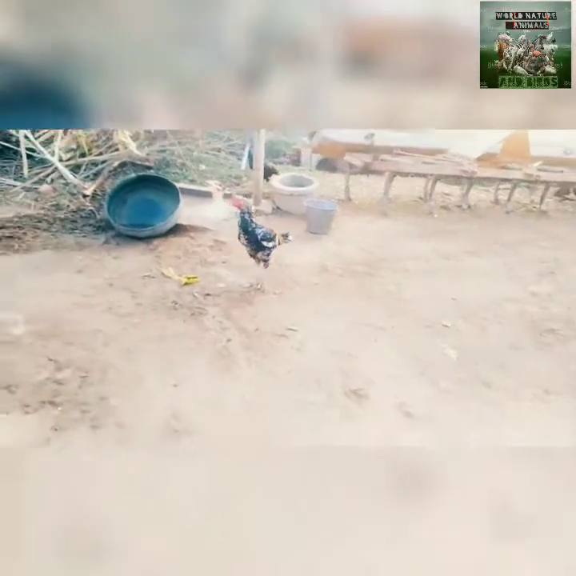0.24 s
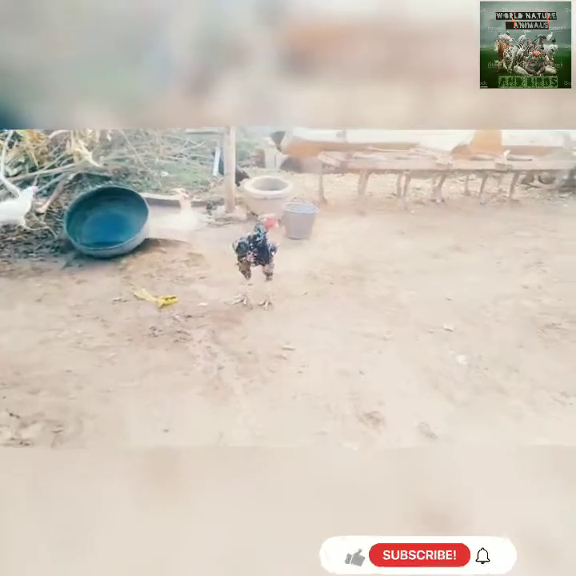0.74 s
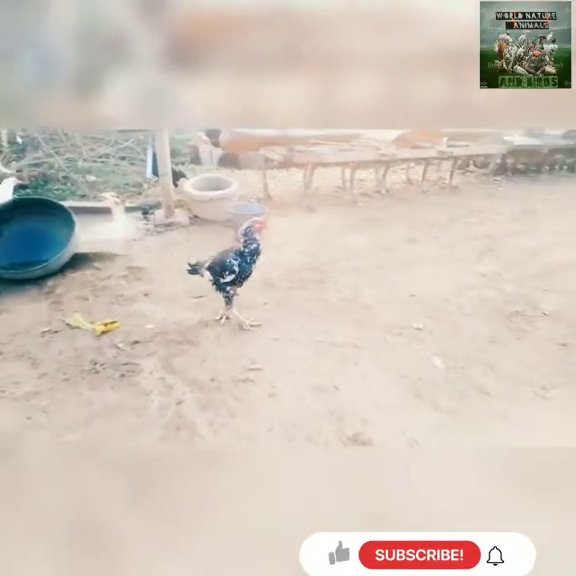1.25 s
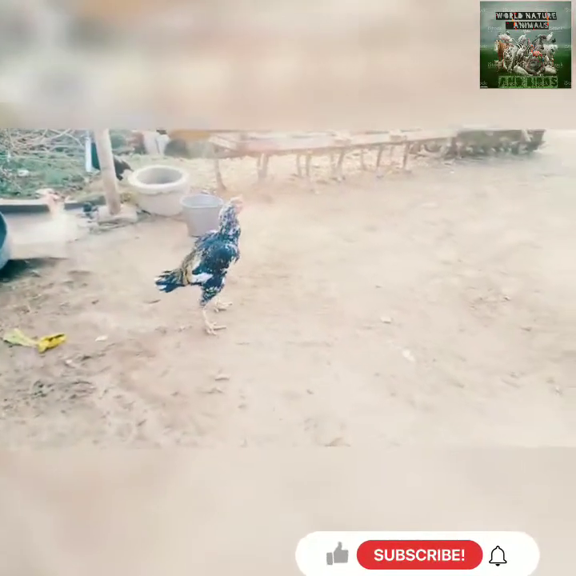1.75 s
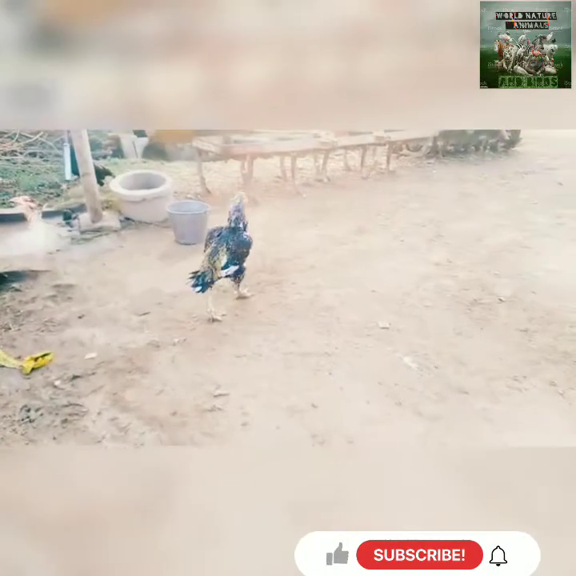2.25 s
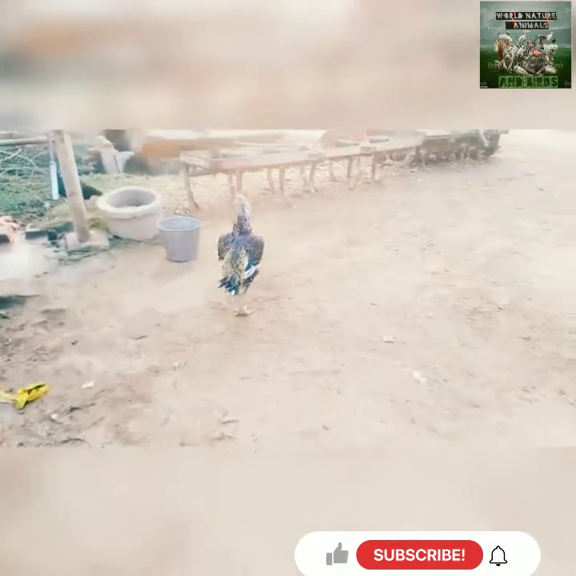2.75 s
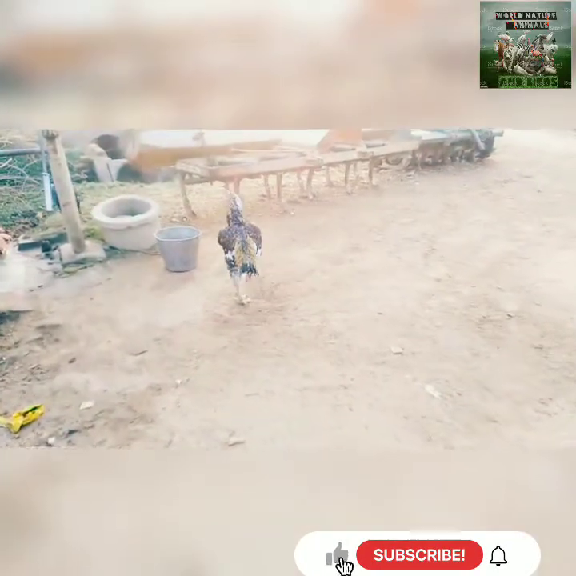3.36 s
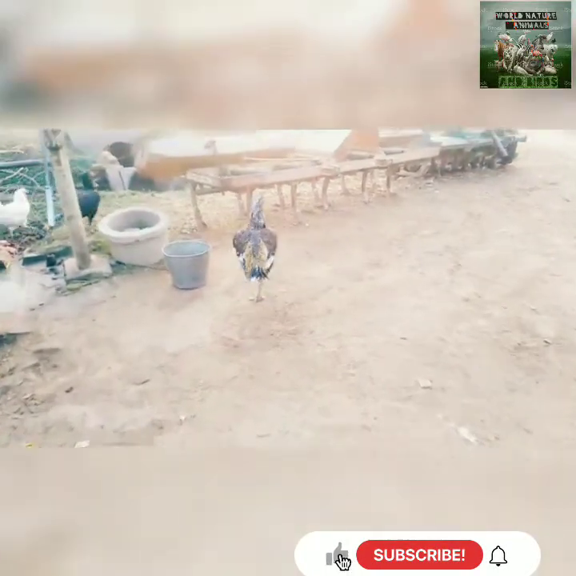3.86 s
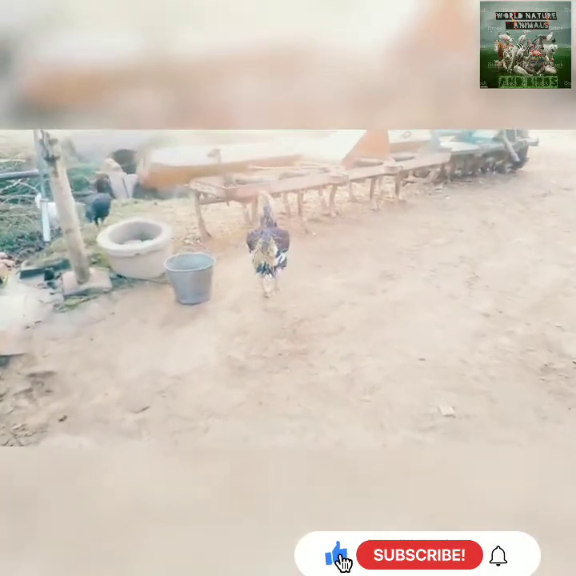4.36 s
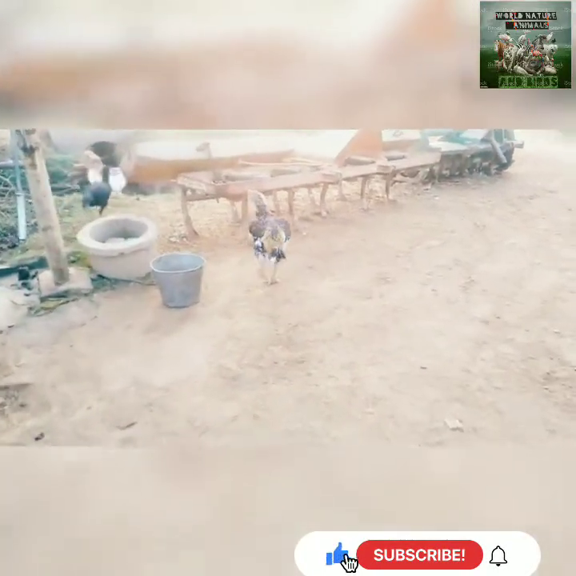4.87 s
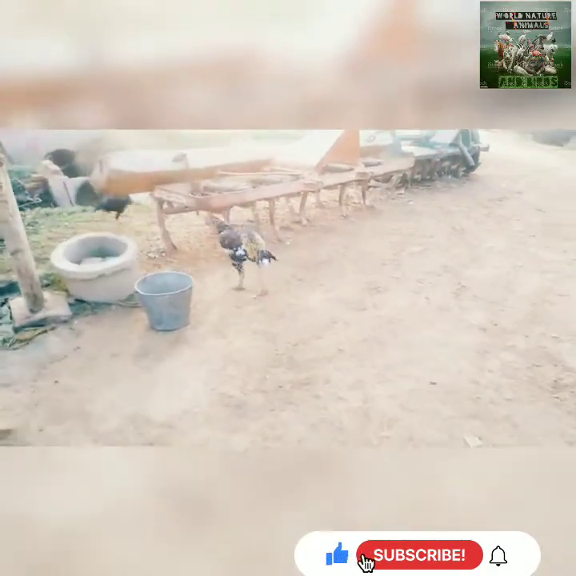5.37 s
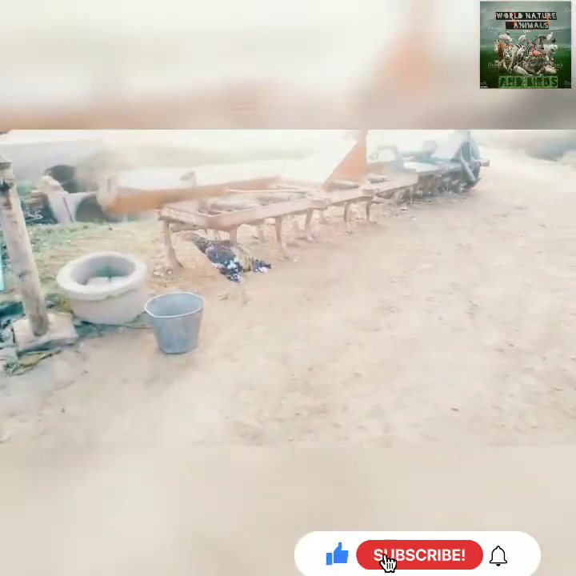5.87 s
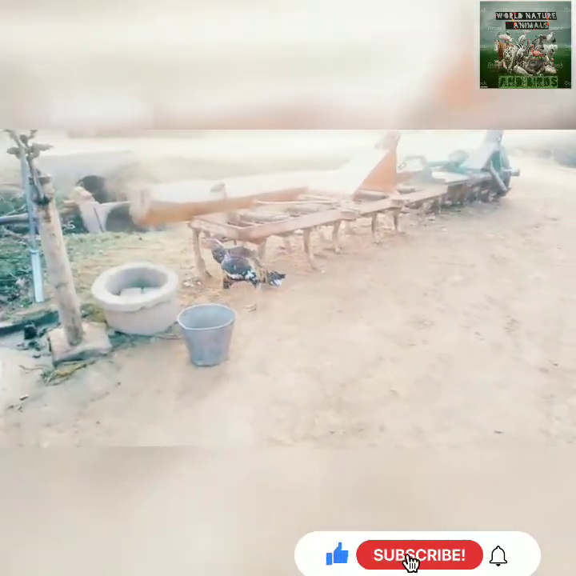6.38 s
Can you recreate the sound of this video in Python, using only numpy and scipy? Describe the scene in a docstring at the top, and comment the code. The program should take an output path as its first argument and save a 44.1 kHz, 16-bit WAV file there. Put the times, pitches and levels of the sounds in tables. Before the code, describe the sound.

A hen outdoors calls once, long and steady at a middle pitch, with small catches and a rough break, after a dull knock. Two strong clucks come right after. Muffled rising notes from a distant hen fill the middle, then scattered throaty clucks and wooden-sounding knocks get busier towards the end. Light scattered yard echo, soft scuffs, low rumble and faint hiss; quiet gaps are thinned by noise suppression on a simple microphone.

```python
"""Hen calling in an open yard

A hen gives one long, almost pure call from a swinging membrane, then scattered short clucks: pulse trains
coloured by throat and beak. Another hen answers from farther off. Bands of grainy noise give scuffs, low thumps
and the bright edges of clucks and knocks; knocks ring briefly under a crack. Faint wavering sines, most left by
noise suppression, flicker about, and low noise rumbles under it all. The yard adds a scattered echo, thin in
bass and brighter up to a treble cut."""
import sys
import numpy as np
from scipy import signal
from scipy.fft import rfft, irfft
from scipy.io import wavfile

SR = 44100
rng = np.random.default_rng(int(sys.argv[2]) if len(sys.argv) > 2 else 0)


def undo_db(level):
    """Turn decibels back into plain size, where 20 dB means ten times bigger."""
    steps = np.asarray(level, float) / 20
    return 10 ** steps


def unload_wav(signal):
    """Save mono or channel-first audio to the path in sys.argv[1] as 16-bit WAV at rate SR, clipped to [-1, 1]."""
    wavfile.write(
        sys.argv[1],
        SR,
        np.round(np.clip(np.atleast_2d(signal).T, -1, 1) * 32767).astype(np.int16),
    )


N = 292383


def at_hz(points, hz):
    """Reads a spectrum on a log-frequency axis."""
    return np.interp(np.log(hz), np.log(np.array(points)[:, 0]), np.array(points)[:, 1])


def wobble(size, hz):
    """Noise through a steep low-pass, run in; spread about 1."""
    low = signal.butter(4, min(hz, .45 * SR), fs=SR, output="sos")
    return signal.sosfilt(low, rng.standard_normal(size + 4000))[4000:] * np.sqrt(SR / (2 * hz))


def add(out, s, sound):
    """Mixes a sound in at a time."""
    i = max(round(s * SR), 0)
    out[i:i + len(sound)] += sound[:N - i]


def along(length_s):
    """0 to 1 over a note."""
    return np.linspace(0, 1, max(round(length_s * SR), 8))


# Rumble spectrum: (frequency [Hz], relative level [dB])
RUMBLE_SPECTRUM = [(26, -42.5), (44, -11.5), (60, -7.5), (96, -1.5), (127, -1), (146, -5.5), (183, -5.5),
                   (211, -7.5), (264, -16), (285, -21.5), (335, -35.5), (420, -38.5), (550, -60),
                   (920, -120)]
RUMBLE_RMS_DB = -60  # before flutter


def rumble():
    """Low noise from far traffic or wind, its level fluttering gently."""
    hz = np.maximum(np.arange(N // 2 + 1) * SR / N, 1)
    low = irfft(rfft(rng.standard_normal(N)) * undo_db(at_hz(RUMBLE_SPECTRUM, hz)), N)
    flutter = undo_db(2.7 * wobble(N, 18))
    return undo_db(RUMBLE_RMS_DB) * low / np.std(low) * flutter


CHANCE_FLOOR_DB, CHANCE_SPREAD_DB = -91, 6
CHANCE_LOW_HZ, CHANCE_HIGH_HZ, CHANCE_LONGEST_S = 850, 5000, .07


def chance_tones(count=14):
    """Rows for short faint tones at chance times and pitches."""
    rows = []
    for when, length, pitch, glide, level in rng.random((count, 5)):
        first_hz = CHANCE_LOW_HZ * (CHANCE_HIGH_HZ / CHANCE_LOW_HZ) ** pitch
        last_hz = first_hz * (.96 + .08 * glide)
        length_s = (.2 + .8 * length) * CHANCE_LONGEST_S
        db = CHANCE_FLOOR_DB + CHANCE_SPREAD_DB * level
        rows.append((when * N / SR, length_s, first_hz, last_hz, db))
    return rows


# Faint wavering tones, most left by noise suppression, thin ones near 5 kHz; level before fade # and flutter:
# (time [s], length [s], first pitch [Hz], last pitch [Hz], level [dB])
WAVERING_TONES = [(0, 0.12, 562, 564, -60.5), (0, 0.16, 1957, 1945, -74), (0, 0.097, 3055, 3000, -76),
                  (0.064, 0.028, 1390, 1440, -72), (0.079, 0.021, 3420, 3150, -58.5),
                  (0.162, 0.012, 1300, 1370, -60), (0.383, 0.16, 850, 875, -75.5),
                  (0.425, 0.12, 1570, 1386, -83), (0.693, 0.053, 947, 932, -80),
                  (0.828, 0.03, 1854, 1850, -74), (0.968, 0.017, 3210, 3120, -66.5),
                  (0.989, 0.19, 1524, 1472, -74), (1.522, 0.046, 2750, 3020, -73.5),
                  (1.826, 0.35, 1040, 1182, -79.5), (2.629, 0.041, 5170, 5000, -78.5),
                  (2.707, 0.028, 5400, 5300, -81.5), (3.489, 0.12, 2386, 2174, -77.5),
                  (3.524, 0.21, 2190, 1948, -76), (4.851, 0.41, 993, 872, -82.5),
                  (4.973, 0.84, 1759, 1740, -76), (5.532, 0.21, 1182, 1350, -71),
                  (5.799, 0.44, 569, 534, -73), (5.821, 0.2, 1527, 1680, -77),
                  (6.124, 0.16, 1490, 1550, -69.5)]


def wavering_tones():
    """Faint wavering sines, most left by noise suppression, some at chance pitches; quick start, then a fade."""
    out = np.zeros(N)
    for s, length_s, first_hz, last_hz, db in WAVERING_TONES + chance_tones():
        u = along(length_s)
        hz = (first_hz + (last_hz - first_hz) * u) * (1 + 0.018 * wobble(len(u), 45))
        swell = np.clip(u * length_s / 0.0024, 0, 1) * (1 - u) ** .5
        flutter = undo_db(3.1 * wobble(len(u), 42)) * (1 + 0.29 * wobble(len(u), 180))
        add(out, s, undo_db(db) * swell * flutter * np.sin(2 * np.pi * np.cumsum(hz) / SR))
    return out


def grainy_noise(rows, grain_db=3.0, streak_db=4.5):
    """Grainy noise, swelling and dying in a band of its own; chance pitches in it stand out."""
    out = np.zeros(N)
    for s, rise_s, t60_s, db, centre_hz, octaves in rows:
        t = np.arange(-3 * rise_s, t60_s, 1 / SR)
        swell = np.where(t < 0, np.exp(-(t / rise_s) ** 2), undo_db(-60 * t / t60_s))
        grain = undo_db(grain_db * (wobble(len(t), 69) + wobble(len(t), 19.2)))
        hz = np.arange(len(t) // 2 + 1) * SR / len(t) + 1
        streaks = np.interp(hz, np.arange(0, 24000, 120), rng.standard_normal(200))
        band = 1 / (1 + (2 * np.log2(hz / centre_hz) / octaves) ** 6)
        noise = irfft(rfft(rng.standard_normal(len(t))) * undo_db(streak_db * streaks) * band, len(t))
        add(out, s - 3 * rise_s, undo_db(db) * swell * grain * noise / np.std(noise))
    return out


# Slower noise swells (scuffs, low thumps, a cluck's tail, call overtones), level before grain:
# (peak time [s], rise [s], fall t60 [s], level [dB], centre [Hz])
NOISE_SWELLS = [(.1, 0.055, 0.4, -70, 394), (0.119, 0.045, 0.65, -84, 3140), (0.249, 0.08, 0.2, -82, 7500),
                (1.169, 0.1, 0.17, -81, 7600), (1.614, 0.017, 0.37, -69.5, 3960),
                (2.04, 0.013, 0.16, -62.5, 392), (2.126, 0.15, 0.82, -82, 6860),
                (3.151, 0.092, 0.27, -84.5, 7140), (3.321, 0.0088, 0.5, -64.5, 5400),
                (3.323, 0.014, 0.67, -73.5, 12800), (3.782, 0.035, 0.26, -78.5, 5480),
                (3.991, 0.03, 0.44, -85, 4100), (4.049, 0.051, 0.36, -82, 8000),
                (4.29, 0.026, 0.35, -74, 493), (4.811, 0.016, 1.36, -80.5, 8800),
                (5.621, 0.074, 0.34, -73.5, 1330), (5.789, 0.024, 1.06, -74, 7100),
                (5.898, 0.063, 0.83, -77, 2650), (5.908, 0.05, 0.32, -70.5, 5000),
                (5.922, 0.051, 0.61, -70.5, 1200), (6.138, 0.021, 0.29, -71.5, 5660),
                (6.56, 0.052, 0.69, -83, 5370)]
SWELL_OCTAVES = 0.96


def noise_swells():
    """Slower swells of banded noise: scuffs, low thumps, a cluck's tail, call overtones."""
    return grainy_noise([tuple(row) + (SWELL_OCTAVES,) for row in NOISE_SWELLS])


# Short bright bursts, mostly the treble edge of clucks and knocks, level before grain:
# (peak time [s], level [dB], centre [Hz], width [octaves])
BRIGHT_BURSTS = [(1.258, -60, 3940, 12), (2.282, -72, 4180, 1.15), (2.554, -63, 8940, 0.37),
                 (3.45, -76, 3450, 0.72), (4.658, -67, 4720, 0.63), (4.97, -62, 2880, 2.15),
                 (6.076, -63, 8600, 2), (6.214, -66, 6900, 0.57)]
BURST_RISE_S, BURST_T60_S = .004, 0.11


def bright_bursts():
    """Short bright noise bursts, mostly the treble edge of clucks and knocks."""
    return grainy_noise([(s, BURST_RISE_S, BURST_T60_S, db, hz, octaves)
                         for s, db, hz, octaves in BRIGHT_BURSTS])


# Knocks, level of the ring at its start: (time [s], level [dB], body pitch [Hz])
KNOCKS = [(0.956, -61, 1640), (1.254, -42.5, 780), (3.086, -62.5, 2670), (4.964, -53.5, 2800),
          (5.329, -48, 574), (5.786, -46, 471)]


def knocks(ring_t60_s=0.038, crack_t60_s=.025, crack_db=-6):
    """A dull body rings briefly under a broad crack."""
    out, t = np.zeros(N), np.arange(round(.06 * SR)) / SR
    for s, db, body_hz in KNOCKS:
        crack = undo_db(crack_db) * wobble(len(t), 5000) * undo_db(-60 * t / crack_t60_s)
        ring = np.sin(2 * np.pi * body_hz * t) * undo_db(-60 * t / ring_t60_s)
        onset = np.clip(t / 0.0022, 0, 1)
        add(out, s, undo_db(db) * (ring + crack) * onset)
    return out


# Beak colour beside the throat peak, before openness: (frequency [Hz], level [dB])
BEAK = [(200, -46), (450, -13.5), (1320, -11.5), (1560, -40), (1900, -28.5), (2200, -20.5), (2450, -24.5),
        (2700, -34.5), (3100, -25), (3350, -40), (3600, -53), (6000, -46), (9000, -85.5)]


def voice(pitch_hz, throat_hz, width_hz, rough, open_db):
    """Harmonics of a pulse train, coloured by throat peak and beak, spread by the windpipe; peak 1."""
    turn = 2 * np.pi * np.cumsum(pitch_hz * (1 + 0.19 * rough * wobble(len(pitch_hz), 100))) / SR
    k = np.arange(1, 34)[:, None]
    hz = k * pitch_hz
    off = 2 * (hz - throat_hz) / max(width_hz, 20)
    throat = 1 / (1 + np.abs(off) ** 2.67)
    beak = undo_db(at_hz(BEAK, hz) + open_db)
    spread = 0.4 * k ** 2  # phase that smears each pulse
    pulses = np.sum((throat + beak) * np.sin(k * turn - spread), axis=0)
    sound = pulses * (1 + rough * wobble(len(pitch_hz), 160))
    return sound / np.max(np.abs(sound))


# Far hen, level before swell and treble loss:
# (time [s], length [s], first pitch [Hz], last pitch [Hz], level [dB], throat [Hz])
FAR_HEN = [(3.268, 0.038, 257, 286, -56.5, 697), (3.478, 0.18, 484, 546.4, -59, 835),
           (3.791, 0.069, 393, 533, -59, 885), (3.968, 0.028, 352, 305.5, -56.5, 770),
           (4.157, 0.056, 281.5, 336, -60.5, 856), (4.253, 0.078, 425, 509, -57.5, 955),
           (4.452, 0.049, 414, 512, -54.5, 936), (5.514, 0.1, 479, 626, -60, 686)]


def far_hen(width_hz=260, rough=.13):
    """Softer, mostly rising notes; distance takes off the treble."""
    out = np.zeros(N)
    for s, length_s, first_hz, last_hz, db, throat_hz in FAR_HEN:
        u = along(length_s)
        swell = np.sin(np.pi * u ** 2.02) ** 0.14
        pitch_hz = first_hz + (last_hz - first_hz) * u
        add(out, s, undo_db(db) * swell * voice(pitch_hz, throat_hz, width_hz, rough, open_db=-5))
    return signal.sosfilt(signal.butter(6, 1300, fs=SR, output="sos"), out)


# Near clucks, and a short echo of the loud one; level before swell, openness before effort, pitch
# at the start:
# (time [s], length [s], pitch [Hz], level [dB], throat [Hz], throat width [Hz], beak openness [dB])
CLUCKS = [(1.492, 0.026, 246, -35, 713, 694, -17), (2.502, 0.061, 295, -39.5, 720, 317, -9.5),
          (2.519, 0.056, 347.3, -25.5, 691, 130, -11.5), (2.74, 0.021, 274, -45, 685, 300, -14),
          (2.76, 0.034, 306.8, -25, 693.5, 173, -14.5), (4.233, 0.029, 296.3, -38.5, 568, 55.7, -35),
          (4.646, 0.039, 282.5, -33.5, 680, 320, 3.5), (5.219, 0.026, 288.8, -29, 854, 667, 10.5),
          (5.91, 0.03, 278, -42, 870, 405, -3), (5.935, 0.019, 321, -46.5, 870, 406, 2),
          (6.046, 0.086, 274.4, -45.5, 598, 310, 15), (6.066, 0.031, 295.9, -32.5, 817, 694, 15.5),
          (6.079, 0.029, 277, -40.5, 733, 390, 1), (6.199, 0.034, 228, -24, 895, 198, -1),
          (6.238, 0.012, 222, -45.5, 906, 128, 5), (6.341, 0.068, 302, -47.5, 558, 200, 9),
          (6.523, 0.017, 300, -59, 580, 151, 7)]
# Share of a cluck spent swelling; grows as the throat leaves its rest
SWELL_SHARE, SWELL_PER_KHZ, THROAT_REST_HZ = .17, 1.38, 680
SAG_PER_S = 6.6  # share of pitch lost by the end, per second of the part after the swell
ROUGH, ROUGH_PER_DB_DOWN, FULL_DB = .13, .008, -24  # soft clucks are hoarser than full ones


def clucks(fade_db=14):
    """Pitch sags throughout each cluck; level swells, then fades as the air sac empties."""
    out = np.zeros(N)
    for s, length_s, pitch_hz, db, throat_hz, width_hz, open_db in CLUCKS:
        u = along(length_s)
        rise = SWELL_SHARE + SWELL_PER_KHZ * abs(throat_hz - THROAT_REST_HZ) / 1000
        rise = np.clip(rise, .05, .8)
        after = np.clip((u - rise) / (1 - rise), 0, 1)
        swell = np.sin(np.pi / 2 * np.clip(u / rise, 0, 1)) ** 2.0
        fade = undo_db(-fade_db * after ** 2) * np.clip((1 - u) / 0.057, 0, 1)
        sagging_hz = pitch_hz * (1 - SAG_PER_S * length_s * (1 - rise) * u ** 1.5)
        effort_db = 0.46 * (db + 32.0)  # more effort, more treble
        beak_db = open_db + effort_db - 10 * after  # the beak closes as it fades
        rough = ROUGH + ROUGH_PER_DB_DOWN * (FULL_DB - db)
        add(out, s, undo_db(db) * swell * fade * voice(sagging_hz, throat_hz, width_hz, rough, beak_db))
    return out


# Partials of the long call, levels of those above 1 before flutter: (multiple of pitch, level [dB])
CALL_PARTIALS = [(1, 0), (1.5, -45), (2, -40), (3, -55), (4, -60)]


def membrane(when, pitch_hz, level_db, hoarse):
    """One membrane swings almost as a sine; hoarseness shakes it and makes every other swing weaker."""
    size = len(when)
    shake = 0.013 * wobble(size, 35) + 0.11 * hoarse * wobble(size, 76)
    turn = 2 * np.pi * np.cumsum(pitch_hz * (1 + shake)) / SR
    tone = np.zeros(size)
    for k, db in CALL_PARTIALS:
        flutter_db = (k > 1) * (1.5 * k * wobble(size, 9) + 3 * wobble(size, 80))
        tone += undo_db(db + flutter_db) * np.sin(k * turn)
    tremor = .07 * wobble(size, 70)
    swing = 1 + tremor + hoarse * (1.06 * wobble(size, 430) + .5 * np.sin(turn / 2))
    edge = np.clip(np.minimum(when - when[0], when[-1] - when) / 0.0056, 0, 1)
    return np.sqrt(2) * undo_db(level_db) * edge * swing * tone  # sqrt(2): level is RMS


# Held note, RMS before catches and tremor: (time [s], pitch [Hz], level [dB])
HELD_NOTE = [(1.52, 691, -52), (1.56, 755, -43), (1.596, 658.4, -37.5), (1.654, 653, -36),
             (1.664, 615, -41), (1.7, 633, -40.5), (1.708, 662, -37), (1.762, 718, -37.5),
             (1.804, 698.5, -35.5), (1.984, 665.3, -37.5), (2.11, 681, -40), (2.238, 640, -49.5),
             (2.255, 627, -74.5)]
# The call cracks, RMS before catches and tremor: (time [s], pitch [Hz], level [dB], hoarseness [0-1])
CALL_END = [(2.262, 643, -61, 0), (2.269, 659, -43.5, 0), (2.296, 567.4, -46.5, 0.21),
            (2.309, 649, -51, 0.33), (2.347, 714, -45.5, 0.52), (2.367, 692.5, -33, 0.04),
            (2.385, 695, -35, 0.24), (2.403, 696, -40.5, 0.1), (2.424, 692, -65, 0.42)]
# The voice catches: (time [s], depth [dB])
CATCHES = [(1.588, 9.5), (1.667, 10.5), (1.925, 8.5), (2.301, 9), (2.355, 3.5), (2.372, 16)]
CATCH_S = 0.0041
CLEAR, ONSET_HOARSE, SETTLE_S = 0.0013, 0.071, .1  # hoarseness held, extra at start, settling time


def long_call():
    """A clean held note, then a hoarse ending; the voice catches now and then."""
    out, t = np.zeros(N), np.arange(N) / SR
    start_s = HELD_NOTE[0][0]
    held = [tuple(row) + (CLEAR + ONSET_HOARSE * np.exp((start_s - row[0]) / SETTLE_S),)
            for row in HELD_NOTE]
    for rows in (held, CALL_END):
        s, *columns = np.transpose(rows)
        when = np.arange(s[0], s[-1], 1 / SR)
        add(out, s[0], membrane(when, *[np.interp(when, s, c) for c in columns]))
    dip_db = sum(depth_db * np.exp(-((t - s) / CATCH_S) ** 2) for s, depth_db in CATCHES)
    return out * undo_db(-dip_db)


BAND_DB, BAND_PER_DEPTH = -48.5, 1  # relative to call level; dB added per dB of catch depth
BAND_HZ, BAND_OCTAVES, BAND_RISE_S, BAND_T60_S = 2800, .3, .025, 0.088


def fourth_harmonic_noise():
    """A narrow noisy band near the call's fourth harmonic, swelling at catches with the call's level."""
    when, level_db = np.transpose([(row[0], row[2]) for row in list(HELD_NOTE) + list(CALL_END)])
    rows = []
    for s, depth_db in CATCHES:
        db = np.interp(s, when, level_db) + BAND_DB + BAND_PER_DEPTH * depth_db
        rows.append((s, BAND_RISE_S, BAND_T60_S, db, BAND_HZ, BAND_OCTAVES))
    return grainy_noise(rows)


YARD_T60_S, YARD_CUT_HZ, YARD_GAP_S = 0.42, 6000, .012


def yard(x, blur):
    """Walls and sheds return a scattered echo after a short gap, thin in bass, brighter up to a cut."""
    t = np.arange(round(YARD_T60_S * SR)) / SR
    tail = wobble(len(t), YARD_CUT_HZ) * undo_db(-60 * t / YARD_T60_S) * (t > YARD_GAP_S)
    tail = signal.lfilter([1, -.9], [1], tail)  # tilts toward treble
    blurred = x * (1 - blur + blur * wobble(N, 350))  # partly blurs the pitch
    return signal.fftconvolve(blurred, tail / np.sqrt(np.sum(tail ** 2)))[:N]


def scene():
    """Near and far sounds; voices, knocks and tones each send a share to the yard."""
    short, far, held, tones = clucks() + knocks(), far_hen(), long_call(), wavering_tones()
    near_echo = yard(undo_db(-12) * short, blur=0.45)
    far_echo = yard(undo_db(-3) * far + undo_db(-9) * tones + undo_db(-26) * held, blur=.12)
    noises = rumble() + noise_swells() + bright_bursts() + fourth_harmonic_noise()
    return (noises + tones + short + far + held + near_echo + far_echo)[None]


GATE_DB, GATE_FROM_HZ = -108, 330  # threshold per bin; lower bins always pass


def suppress(x):
    """Bins pass by recent power over a threshold: tails end early, faint noise turns streaky."""
    hz, _, bins = signal.stft(x, SR, nperseg=1024, noverlap=768)
    power = signal.lfilter([.3], [1, -.7], np.abs(bins) ** 2, axis=-1)
    power = np.maximum(power, np.abs(bins) ** 2 * 0.24)
    passed = np.clip(1 - undo_db(GATE_DB) ** 2 / (power + 1e-20), 0, 1)
    gain = np.where(hz[:, None] > GATE_FROM_HZ, passed, 1)
    return signal.istft(bins * gain, SR, nperseg=1024, noverlap=768)[1][..., :N]


HISS_DB, HISS_POLE = -91, 0.57  # white-noise RMS ahead of the one-pole low-pass


def hiss(shape):
    """Faint white noise, slightly dulled by a one-pole low-pass."""
    return signal.lfilter([1], [1, -HISS_POLE], undo_db(HISS_DB) * rng.standard_normal(shape))


def low_pass(x):
    """Removes everything above the highest recorded frequency."""
    return signal.sosfilt(signal.butter(12, 14470, fs=SR, output="sos"), x)


def record(dry):
    """A noise suppressor, then a faint hiss."""
    mix = suppress(dry) + hiss(dry.shape)
    return low_pass(mix)


dry = scene()
out = record(dry)
unload_wav(out)
```